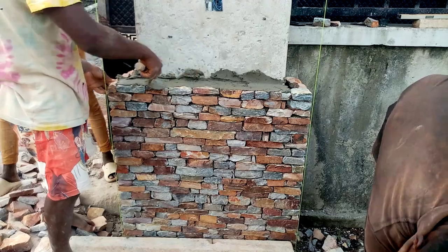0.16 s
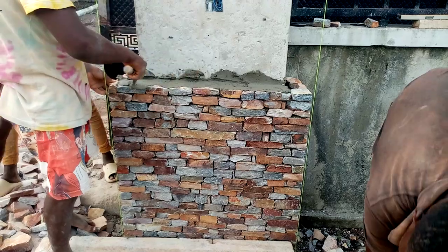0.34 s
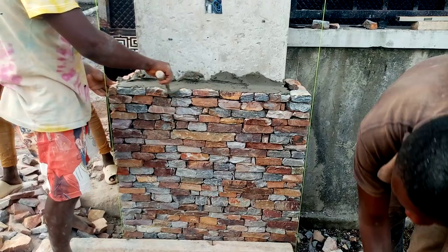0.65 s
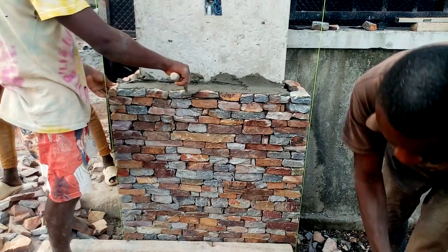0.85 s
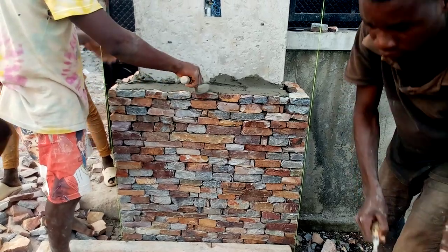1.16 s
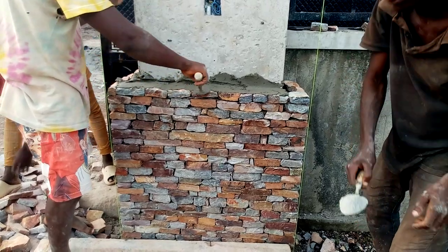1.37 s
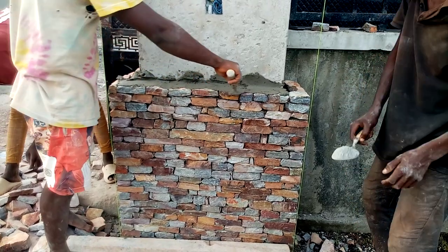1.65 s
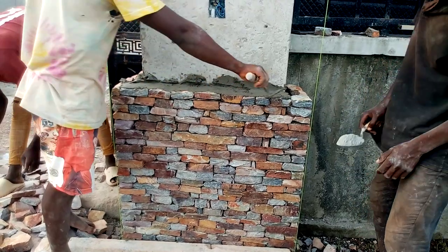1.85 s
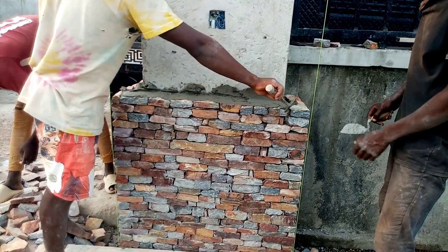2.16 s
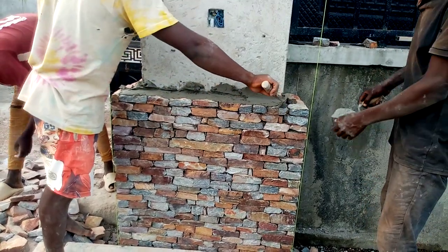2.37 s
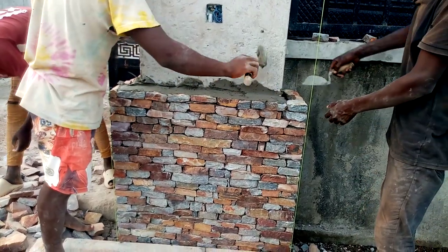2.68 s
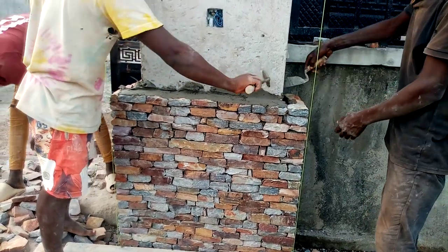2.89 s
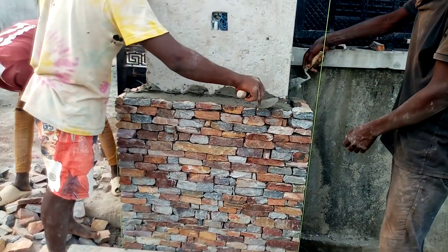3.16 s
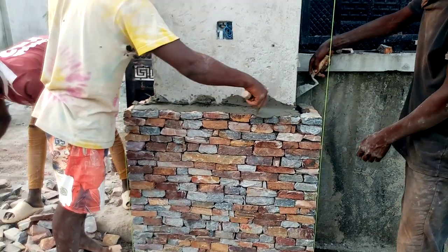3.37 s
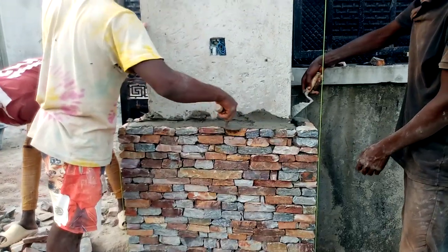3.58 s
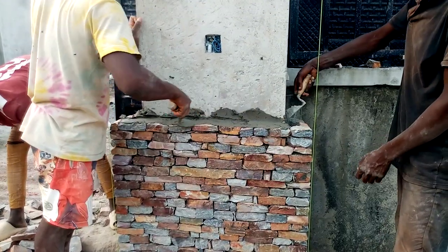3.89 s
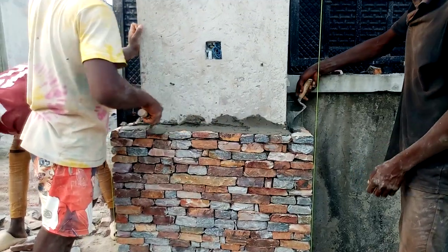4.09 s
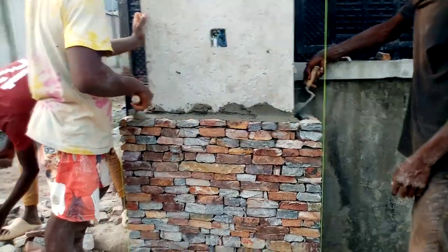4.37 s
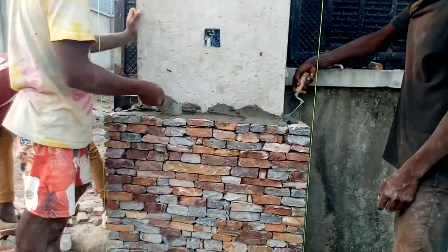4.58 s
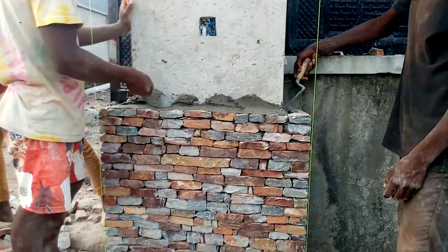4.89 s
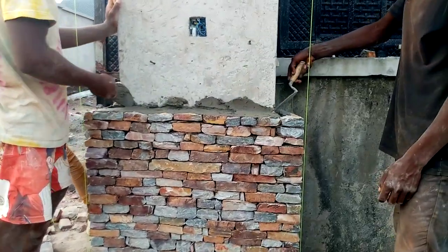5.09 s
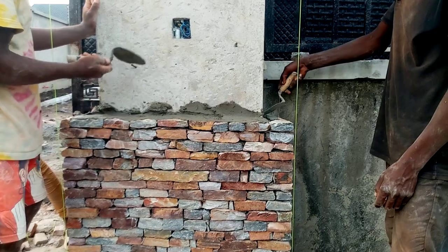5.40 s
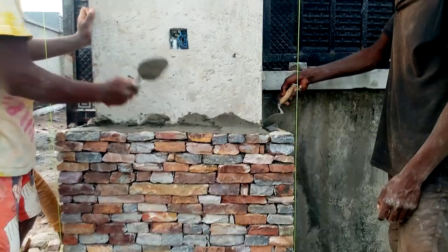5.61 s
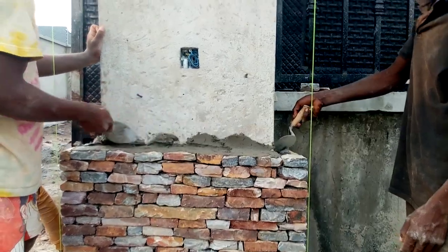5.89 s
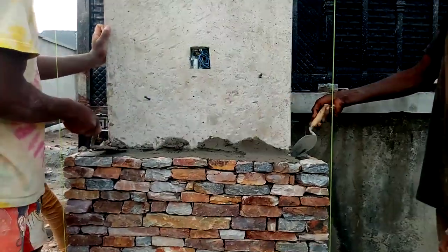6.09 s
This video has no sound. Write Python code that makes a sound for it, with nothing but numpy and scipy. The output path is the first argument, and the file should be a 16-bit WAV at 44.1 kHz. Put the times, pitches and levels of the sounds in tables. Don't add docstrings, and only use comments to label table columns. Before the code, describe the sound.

A steel trowel grates through gritty wet mortar and taps stone close by, with four hard hammer cracks echoing outdoors over hiss and motor drone.

```python
import sys
import numpy as np
from scipy import signal
from scipy.fft import rfft, irfft
from scipy.io import wavfile
from scipy.ndimage import uniform_filter1d

SR = 44100
rng = np.random.default_rng(int(sys.argv[2]) if len(sys.argv) > 2 else 0)


def dump_mix(stems):
    frames = np.atleast_2d(stems).T
    limited = np.clip(frames, -1, 1)
    pcm = np.round(limited * 32767).astype(np.int16)
    wavfile.write(sys.argv[1], SR, pcm)


def voltage_ratio(decibels):
    exponent = np.asarray(decibels, float) / 20
    return 10 ** exponent


N = 275625
TIME = np.arange(N) / SR


def colour(x, points):
    hz, db = np.transpose(points)
    size = 4096
    grid_hz = np.arange(size + 1) * SR / (2 * size)
    curve_db = np.interp(np.log(grid_hz + 1), np.log(hz), db)
    cepstrum = irfft(np.log(voltage_ratio(curve_db)))
    cepstrum[1:size] *= 2
    cepstrum[size + 1:] = 0
    impulse = irfft(np.exp(rfft(cepstrum)))[None, :size]
    return signal.oaconvolve(np.atleast_2d(x), impulse, axes=1)[:, :N]


def band(x, lo_hz, hi_hz):
    sos = signal.butter(2, [lo_hz, min(hi_hz, .45 * SR)], "bandpass", fs=SR, output="sos")
    return signal.sosfilt(sos, x) * np.sqrt(SR / 2 / (hi_hz - lo_hz))


def ring(x, hz, t60_s):
    r = np.exp(-np.log(1000) / (t60_s * SR))
    w = 2 * np.pi * hz / SR
    return signal.lfilter([0, r * np.sin(w)], [1, -2 * r * np.cos(w), r * r], x)


def pair(alike):
    first, other = rng.standard_normal((2, N))
    alike = np.clip(alike, 0, 1)
    return np.array([first, alike * first + np.sqrt(1 - alike ** 2) * other])


def ports(x, pan_db, lag_ms):
    late = np.interp(TIME - lag_ms / 1000, TIME, x[1], left=0)
    return np.array([x[0] * voltage_ratio(pan_db / 2), late * voltage_ratio(-pan_db / 2)])


def walk(rate_hz):
    k = int(SR / rate_hz)
    held = np.repeat(rng.standard_normal(N // k + 1), k)
    return uniform_filter1d(held, k)[:N] / np.sqrt(2 / 3)


def air():
    # frequency in Hz, level in dB per Hz.
    hiss_colour = [(170, -18), (371, -22), (700, -7.5), (1240, -4), (4500, -16), (9000, -22), (10000, -48),
                   (17600, -41)]
    # time in seconds, level in dB.
    breeze = [(.15, 2.5), (.9, 2), (1.24, -3.5), (1.6, 3.5), (2.6, -0.5), (2.83, -0.5), (3.5, 0.5),
              (4.4, 2), (4.63, -3), (4.76, 2.5), (4.93, -1), (5.08, 1), (5.2, 0.5), (5.33, 1.5), (5.5, -2),
              (5.66, 4), (5.83, -3.5), (6.0, 2)]
    # low edge in Hz, high edge in Hz, level in dB, dB per dB of breeze.
    layers = [(150, 930, 5, 1.54), (1114, 2080, 1.5, 2.5), (2280, 5260, -0.5, 4), (5160, 17000, 4.5, 2)]
    x = colour(pair(0.43), hiss_colour)
    x = x / x.std()
    breeze_db = np.interp(TIME, *np.transpose(breeze))
    out = 0
    for lo_hz, hi_hz, db, slope in layers:
        layer = band(x, lo_hz, hi_hz) * np.sqrt(2 * (hi_hz - lo_hz) / SR)
        out = out + layer * voltage_ratio(-53 + db + slope * breeze_db + 1.5 * walk(14))
    return ports(out, 3.4, 0.88)


def sand(gusty):
    grains = voltage_ratio(5.7 * np.minimum(rng.exponential(size=N), 4.0)) * (rng.random(N) < .06)
    gust_db = gusty * (7.7 * walk(150) + 2.3 * walk(30))
    push = (0.54 + uniform_filter1d(grains, size=24) * 3.3) * voltage_ratio(np.minimum(gust_db, 4))
    return push / np.sqrt(np.mean(push ** 2))


def grit():
    # time in seconds, level in dB.
    pressure = [(.15, -45.5), (.53, -42.5), (.78, -43.5), (.95, -55.5), (1.08, -52), (1.27, -99),
                (1.31, -44.5), (1.56, -49.5), (1.86, -48), (2.75, -49.5), (3.02, -52), (3.23, -42.5),
                (3.6, -47.5), (3.85, -40.5), (4.1, -44.5), (4.46, -55), (5.64, -51), (6.25, -48)]
    # low edge in Hz, high edge in Hz, level in dB at firm pressure, dB per dB of pressure.
    layers = [(1390, 5250, -36, 2.64), (4180, 9120, -38.5, 2.07), (320, 820, -43, 3),
              (9000, 9700, -43, 16.5), (14700, 15500, -41.5, 2)]
    firm_db, flicker_db = -40, 1.3
    press_db = np.interp(TIME, *np.transpose(pressure)) - firm_db
    x = pair(0.89) * sand(.22) * voltage_ratio(flicker_db * walk(30))
    out = 0
    for lo_hz, hi_hz, db, slope in layers:
        level_db = db + slope * press_db + flicker_db * walk(40) + 2.6 * walk(160)
        out = out + voltage_ratio(level_db) * band(x, lo_hz, hi_hz)
    return ports(out, 2.7, 1.205)


def rumble():
    # peak time in seconds, level in dB, build-up in seconds, fade in seconds.
    surges = [(.49, -50, 0.64, 1), (1.07, -43.5, 0.073, 0.075), (1.46, -46.5, 0.77, 0.26),
              (1.949, -42, 0.014, 0.078), (2.289, -43, 0.024, 0.037), (2.7, -43.5, 0.15, .2),
              (3.29, -40.5, 1, 0.18), (3.5, -36.5, 0.16, 0.38), (3.787, -30.5, 0.052, 0.018),
              (4.21, -37.5, 0.066, 0.18), (4.65, -48, 0.033, 0.044), (5.08, -43.5, 0.56, 0.18),
              (5.55, -47, 0.54, 0.11), (6.14, -49, 0.3, 0.2)]
    # frequency in Hz, level in dB per Hz.
    drone_colour = [(30, -59), (55, -4), (100, -6), (122, 1.5), (137, -1), (170, -8), (230, -20.5),
                    (450, -65)]
    idle_db, surge_db = -55.5, 13.5
    db = np.full(N, idle_db)
    for s, top_db, build_s, fade_s in surges:
        away = np.maximum((s - TIME) / build_s, (TIME - s) / fade_s)
        db = np.maximum(db, top_db - surge_db * away)
    x = colour(pair(0.68), drone_colour)
    return ports(x / x.std() * voltage_ratio(db - 0.5), 2.0, 0.68)


def knock(age, t60_ms, tail_db):
    fade_db = 60 * age / (max(t60_ms, 4) / 1000)
    decay = voltage_ratio(-6.5 - 3.6 * fade_db) + voltage_ratio(-fade_db) + voltage_ratio(tail_db - 0.083 * fade_db)
    return (1 - np.exp(-age / 0.00021)) * decay


def slide(age, length_ms, tail_db):
    over = np.maximum(age - length_ms / 1000, 0)
    return (1 - np.exp(-age / 0.00086)) * (np.exp(-over / 0.0042) + voltage_ratio(tail_db) * np.exp(-over / 0.012))


def cracks(events, shape, push, crest_db, tail_db, sizzle_db, body_hz, patchy_db=2.5):
    env = np.zeros((3, N + 8192))
    age = np.arange(8192) / SR
    for s, db, thud_db, edge_db, ms in events:
        at = int(s * SR)
        parts_db = np.array([[thud_db], [0], [edge_db]])
        env[:, at:at + 8192] += voltage_ratio(db + crest_db + parts_db) * shape(age, ms, tail_db)
    env[:, :N] *= voltage_ratio(patchy_db * np.array([walk(220) for _ in env]))
    impacts = np.clip(pair(0.45), -1.2, 1.2) * 1.236
    thud, body, edge = impacts * push * env[:, None, :N]
    out = band(thud, 504, 1940) + band(body, body_hz, 5400) + band(edge, 4435, 8470)
    out = out + voltage_ratio(sizzle_db) * band(edge + 0.39 * body, 9580, 11380)
    return out + voltage_ratio(sizzle_db + 9.5) * band(edge + 0.5 * body, 14200, 17900)


def contacts(table, thud_db, ms):
    return [(s, db, thud_db, edge_db, ms) for s, db, edge_db in table]


def trowel():
    # start in seconds, peak in dB, edge in dB.
    dry_taps = [(.5762, -17, 1), (.599, -20, 3.5), (.6545, -22, 0), (.6948, -15.5, -3), (.8194, -35, 12),
                (.9351, -18, 8), (1.0441, -18.5, 3), (1.4031, -16, 8), (1.6154, -15.5, -19),
                (1.722, -12.5, -0.5), (2.0335, -14.5, 3), (2.6349, -13.5, -5.5), (2.9257, -15.5, -3.5),
                (3.349, -20, 6.5), (3.3674, -17.5, 8.5), (3.493, -9.5, -5), (4.0427, -10.5, -2.5),
                (4.2083, -7, -9.5), (4.3246, -15, -4), (4.9841, -18, -2.5), (5.1248, -33, -7),
                (5.136, -29.5, -5), (5.2758, -11.5, 4), (5.5628, -9.5, 3.5), (5.637, -26.5, 1),
                (5.8558, -32, -9), (5.8605, -9, -4.5), (5.8744, -18, -10), (5.891, -38, -28),
                (6.0858, -23.5, 0), (6.1739, -12.5, 5.5)]
    pats = [(.172, -34.5, 11), (.194, -30, 7), (0.43, -20, -7), (.6722, -21, 10), (0.57, -25.5, 7),
            (1.6725, -16, 9), (2.0694, -17.5, 1), (2.3, -26, -3.5), (1.778, -30, 6.5), (2.155, -41.5, 9),
            (2.18, -36, 0), (1.016, -31, 0), (.634, -41, -12), (2.601, -40, 10), (2.788, -29.5, 3),
            (2.845, -37, -9), (6, -26.5, -16), (2.4, -29.5, -15), (3.635, -26, 8.5), (3.8, -27, 13),
            (3.933, -24, 10), (5.094, -27, -3), (3.5, -31, -11), (3.2089, -14, 9.5), (3.392, -21.5, 9.5),
            (5.9287, -27.5, -14), (6.0735, -21, 4)]
    dry_slips = [(.4367, -14.5, -21), (.4514, -18.5, -3), (.8764, -25, 10), (1.291, -19, 1.5),
                 (1.305, -28.5, 7), (1.3623, -18, 0.5), (1.3809, -18, -10.5), (1.453, -10, -1.5),
                 (1.4854, -27, -17), (1.4918, -16.5, 6.5), (1.5604, -21.5, -9), (2.4458, -20.5, -13),
                 (2.745, -25.5, -7), (3.2715, -27, 5), (3.2889, -23.5, 4), (3.3044, -23.5, 9),
                 (3.421, -13.5, 0), (3.7085, -15, 3), (3.724, -14, -2), (3.7569, -12, -5), (4.1041, -21, 2),
                 (4.1344, -26, -8), (6.1409, -24, -15), (6.1594, -15.5, -5)]
    smears = [(.2478, -37, -7), (.4254, -23.5, 11), (.893, -24.5, 10), (.9004, -25, 6),
              (.9114, -26.5, 13.5), (.918, -19, -11), (1.4154, -16, 1.5), (1.429, -22, -22),
              (2.2024, -33, 4), (2.2358, -34, 0), (2.8804, -27.5, -24.5), (3.02, -26.5, 5),
              (3.238, -12, 3.5), (4.1579, -25, 8), (4.1697, -18, -4), (4.1967, -27, -25.5),
              (4.2214, -18, -10), (4.3819, -45, -14.5), (4.3994, -43, -21), (5.7588, -37, -13)]
    shoves = [(.3244, -28, -6), (.4758, -26, -0.5), (.4994, -24, -5), (.605, -25, -6), (.74, -20.5, -2),
              (.852, -20, -1), (.868, -23.5, -3), (.885, -30, 1), (.902, -38, -4), (1.339, -28.5, -15),
              (1.8568, -25, -7), (2.985, -34, 3.5), (3.627, -18.5, -1.5), (3.6744, -20, 3.5),
              (3.9774, -19.5, 0.5), (3.9937, -19, -9), (4.114, -22.5, 2), (4.4887, -42, -5),
              (4.6808, -30.5, -6), (4.8285, -25.5, -3), (5.03, -24, -4), (5.0594, -31, 1), (5.089, -37, -7),
              (5.9464, -30, -12), (5.9763, -24.5, -17), (5.9994, -41, -10)]
    # frequency in Hz, level in dB, t60 in seconds.
    tap_ring = [(1606, -36.5, 0.03), (2420, -26, 0.0079), (2868, -23, 0.0074), (3665, -22, 0.012),
                (4265, -18, 0.0055), (4894, -24.5, 0.011), (5645, -19.5, 0.0033), (6600, -14, 0.0018)]
    tap_t60_ms, slip_ms, shove_ms = 30.7, 5.8, 16.8
    taps = contacts(dry_taps, -44, tap_t60_ms) + contacts(pats, -7, tap_t60_ms)
    slips = contacts(dry_slips, -13, slip_ms) + contacts(smears, -5.5, slip_ms)
    slips = slips + contacts(shoves, -26, shove_ms)
    taps = cracks(taps, knock, 0.64, crest_db=-11.5, tail_db=-25.5, sizzle_db=-0.5, body_hz=1226)
    taps = taps + sum(voltage_ratio(db) * ring(taps, hz, t60_s) for hz, db, t60_s in tap_ring)
    slips = cracks(slips, slide, sand(0.059), crest_db=-14.5, tail_db=-16.5, sizzle_db=-8, body_hz=1200)
    return ports(taps + slips, 5.15, 1.371)


def feet():
    # middle in seconds, length in seconds, level in dB, frequency in Hz.
    shuffles = [(0.334, .12, -48.5, 288), (0.697, 0.083, -54, 237), (0.95, 0.035, -52.5, 238),
                (1.07, 0.034, -55, 390), (2.076, 0.075, -53.5, 300), (2.395, 0.057, -51, 730),
                (3.94, 0.13, -53.5, 255), (4.47, 0.15, -54.5, 1310), (4.53, 0.043, -57, 230),
                (5.16, 0.043, -50, 600), (4.55, 0.038, -56, 7200), (5.413, .03, -61.5, 7260),
                (6.175, 0.01, -38.5, 5090)]
    out = 0
    x = pair(0.74) * voltage_ratio(2.9 * walk(60))
    for s, length_s, db, hz in shuffles:
        swell = np.exp(-((TIME - s) / length_s) ** 2)
        out = out + voltage_ratio(db) * swell * band(x, hz * 0.836, hz * 1.18)
    return ports(out, 2.5, 1.11)


def hollows():
    # start in seconds, peak in dB, frequency in Hz, t60 in seconds.
    booms = [(0.491, -40.5, 96.7, 0.1), (0.611, -43, 110, 0.12), (.9, -48, 160, 0.094),
             (1.051, -42.5, 126.3, 0.18), (1.288, -52, 123, .25), (1.399, -42, 114.2, 0.56),
             (1.941, -40, 129.7, 0.12), (2.285, -57, 107.4, 0.091), (2.399, -46.5, 108, 0.12),
             (2.659, -44, 112, 0.14), (2.84, -44, 138, 0.2), (3.044, -26, 99.7, 0.047),
             (3.094, -38, 127, 0.12), (3.293, -38.5, 113, 0.12), (3.47, -35.5, 112.6, 0.2),
             (3.549, -38.5, 106.7, 0.24), (3.774, -31, 94.6, 0.07), (4.64, -39, 129, 0.11),
             (5.041, -45, 121, 0.51), (5.53, -40.5, 137, 0.1), (6.122, -40, 75, 0.12)]
    # start in seconds, peak in dB, frequency in Hz.
    clunks = [(0.658, -34.5, 880), (0.879, -34, 850), (1.557, -37, 900), (1.616, -40, 920),
              (1.683, -36, 840), (1.721, -38, 930), (2.073, -31.5, 870), (2.338, -34, 870),
              (2.378, -36, 907), (2.87, -35.5, 986), (3.553, -49, 850), (4.381, -35, 930),
              (4.401, -34.5, 722), (4.491, -40.5, 690), (4.578, -46, 850), (4.679, -40.5, 944),
              (4.848, -35, 1030), (5.134, -30.5, 1037), (5.642, -45, 860), (6.074, -33, 834)]
    ground, bed = np.zeros((2, N + 16384))
    age = TIME[:16384]
    rise = 1 - np.exp(-age / 0.0051)
    for s, db, hz, t60_s in booms:
        fade = voltage_ratio(db + 9.0 - 60 * age / t60_s)
        ground[int(s * SR):][:16384] += fade * rise * np.sin(2 * np.pi * hz * age)
    for s, db, hz in clunks:
        fade = voltage_ratio(db - 1.0 - 60 * age / 0.056)
        bed[int(s * SR):][:16384] += fade * np.sin(2 * np.pi * hz * age)
    out = ground[:N] + bed[:N] * voltage_ratio(2 * walk(330))
    return ports(np.array([out, out]), 5.2, 1.08)


def bird():
    # start in seconds, level in dB.
    chips = [(1.025, -50), (1.055, -60), (1.103, -42.5), (1.136, -44), (4.52, -51), (4.572, -51),
             (4.598, -46), (4.653, -43), (4.685, -45), (5.673, -45), (5.727, -49.5), (5.762, -49)]
    # start in seconds, level in dB, first frequency in Hz.
    tweets = [(1.075, -52, 8400), (1.115, -54, 8900), (1.155, -45, 9000), (1.198, -47, 9050),
              (1.24, -48, 9050), (1.27, -33, 7780), (4.524, -43, 7500), (4.552, -52, 8650),
              (4.595, -53, 8900), (4.635, -47, 9050), (4.678, -41, 8900), (4.72, -45, 9000),
              (5.33, -52, 8950), (5.375, -54, 9000), (5.39, -43, 7500), (5.42, -52, 8900)]
    chip_hz, chip_s, chip_fall = 5800, .019, .06
    out = np.zeros(N)
    age = TIME[:1024] / chip_s
    shape = np.interp(age, [0, .2, .5, 1], [0, 0.69, 0.74, 0.23])
    for s, db, hz in [(s, db, chip_hz) for s, db in chips] + tweets:
        glide_hz = hz * (1 - chip_fall * np.minimum(age, 1) ** 3)
        out[int(s * SR):][:1024] += voltage_ratio(db) * shape * np.sin(2 * np.pi * np.cumsum(glide_hz) / SR)
    out = out * voltage_ratio(2.7 * walk(330))
    out = out + 0.16 * np.roll(out, 600) + 0.11 * np.roll(out, 1100)
    return ports(np.array([out, out]), 1.6, 0.591)


def goat():
    # start in seconds, end in seconds, first frequency in Hz, last frequency in Hz, level in dB.
    bleats = [(1.336, 1.47, 877, 900, -60), (1.712, 1.82, 761, 802, -54.5), (1.75, 1.895, 535, 517, -57.5),
              (1.967, 2.136, 960, 895, -55), (4.326, 4.76, 957, 954, -60.5),
              (4.627, 4.796, 610, 610, -65.5), (4.77, 4.84, 930, 945, -66), (4.887, 4.97, 1077, 1066, -60),
              (5.282, 5.389, 985, 990, -56.5), (5.597, 5.799, 878, 902, -57), (5.618, 5.706, 559, 588, -63),
              (5.636, 5.713, 1070, 1036, -55)]
    out, quaver, tremble = np.zeros(N), walk(30), walk(80)
    for t0, t1, first_hz, last_hz, db in bleats:
        on = slice(int(t0 * SR), int(t1 * SR))
        t = TIME[on]
        hz = np.interp(t, [t0, t1], [first_hz, last_hz]) * (1 + 0.012 * quaver[on])
        phase = 2 * np.pi * np.cumsum(hz) / SR
        swell = np.clip(np.minimum(t - t0, t1 - t) / 0.027, 0, 1)
        voice = np.sin(phase) + voltage_ratio(-14) * np.sin(2 * phase)
        out[on] += swell * voltage_ratio(db + 2.0 + 4.2 * tremble[on]) * voice
    return ports(np.array([out, out]), 9.3, 1.75)


def hammer():
    # start in seconds, peak in dB, thud in dB, edge in dB.
    blows = [
        (1.5015, -9.5, -17.5, -9),
        (2.2834, -7, -16.5, -3),
        (3.042, -6.5, -14, -3),
        (3.7771, -6, -17.5, -4.5),
    ]
    # frequency in Hz, level in dB, t60 in seconds.
    head_modes = [(2630, -50, 0.073), (5780, -43, 0.017), (6640, -30, 0.0059), (7510, -36.5, 0.052),
                  (10520, -33.5, 0.064), (12000, -43, 0.071)]
    head_db = [-7.5, -1.5, -0.5, -4.5]
    blow = cracks([(*row, 29.1) for row in blows], knock, 0.93, crest_db=3.0, tail_db=-27.5,
                  sizzle_db=-15.5, body_hz=1666, patchy_db=0.95)
    blow = blow + sum(voltage_ratio(db + 6.7 * walk(250)) * ring(blow, hz, t60_s) for hz, db, t60_s in head_modes)
    blow = blow + voltage_ratio(-23) * band(np.abs(blow), 152, 1100)
    age = np.arange(30000) / SR
    yard = voltage_ratio(-43.5 - 60 * age / 0.51) * np.minimum(age / 0.096, 1)
    slap_s = .051
    wall = (age > slap_s) * voltage_ratio(-49 - 60 * np.abs(age - slap_s) / 0.31)
    echo = signal.oaconvolve(blow, pair(0.063)[:, :len(age)] * (yard + wall), axes=1)[:, :N]
    free = blow * voltage_ratio(np.interp(TIME, np.transpose(blows)[0], head_db))
    hiss_tail = pair(0.71)[:, :len(age)] * voltage_ratio(-29.0 - 60 * age / 0.43)
    hiss = signal.oaconvolve(free, hiss_tail, axes=1)[:, :N]
    echo = echo + voltage_ratio(-22.5) * band(band(hiss, 10300, 11600), 10200, 11800)
    return ports(blow, 1.0, 1.419) + ports(echo, 0.83, 0.9)


def plops():
    # start in seconds, peak in dB, hollow frequency in Hz.
    lumps = [(2.79, -38, 402), (2.844, -49, 285), (2.867, -29.5, 237), (2.881, -32.5, 238),
             (2.974, -30, 620), (3.098, -27, 550), (3.55, -40, 220), (4.206, -24.5, 297), (4.247, -23, 368),
             (4.282, -24, 505), (4.296, -30, 350)]
    out = np.zeros(N)
    age = TIME[:2048]
    slap = voltage_ratio(-9.5) * band(rng.standard_normal(N), 370, 1630)
    sag_per_s = 46
    sunk = (1 - np.exp(-age * sag_per_s)) / sag_per_s
    for s, db, hz in lumps:
        at = int(s * SR)
        shape = (1 - np.exp(-age / 0.00074)) * np.exp(-age * hz * 0.97)
        out[at:at + 2048] += voltage_ratio(db + 7.5) * (np.sin(2 * np.pi * hz * sunk) + slap[at:at + 2048]) * shape
    return ports(np.array([out, out]), 8.0, 1.39)


def blade():
    # start in seconds, length in seconds, level in dB, grip from 0 (flat) to 1 (tip).
    drags = [
        (4.666, 0.061, -52.5, .01),
        (4.825, 0.031, -44.5, 0.028),
        (5.029, 0.016, -37.5, 0.02),
        (5.063, .06, -42.5, 0.048),
        (5.944, 0.086, -41, 0.87),
    ]
    # frequency in Hz, width in Hz, dB held flat, dB held on the tip.
    modes = [(453, 29, -18.5, 3.5), (904, 14, -20.5, -12), (1380, 22, -20.5, 8), (1720, 42, -0.5, -16.5),
             (1850, 37, -2.5, 5), (2830, 18.5, 3.5, 4), (3300, 28, -6.5, -15.5), (3920, 29, -10, -7),
             (4890, 37, -18, -1.5), (5090, 30, -7.5, -5), (5540, 79, -27, -18), (6480, 120, -11, -5),
             (6840, 60, -21, -7), (3580, 80, -21, -20)]
    top_modes = [(6000, 30, -28, -20), (7930, 120, -7, -20), (8330, 45, -10, -23), (8930, 35, -13, -24),
                 (10000, 40, -3, -20), (10500, 35, -14, -28)]
    on = slice(int(drags[0][0] * SR), N)
    t = TIME[on]
    drag, grip = np.zeros(len(t)), np.zeros(len(t))
    out = np.zeros((2, N))
    for s, length_s, db, tip in drags:
        age = t - s
        fade_db = 47 * age + 650 * np.maximum(age - length_s, 0)
        drag = drag + np.clip(age / .003, 0, 1) * voltage_ratio(db - np.maximum(fade_db, 0))
        grip[age > 0] = tip
    chatter = (pair(0.85) * voltage_ratio(2.23 * walk(64)))[:, on] * drag
    bent = np.cumsum(1 + 0.0028 * walk(25)[on]) / SR
    lock_db = -30.5
    for hz, width_hz, flat_db, tip_db in modes + top_modes:
        grip_db = flat_db + grip * (tip_db - flat_db)
        locked = drag * voltage_ratio(grip_db + lock_db + 2.5 * walk(66)[on]) * np.sin(2 * np.pi * hz * bent)
        out[:, on] += locked * np.sqrt(SR / 2 / width_hz)
        rung = ring(chatter * voltage_ratio(grip_db) + 1e-18, hz, 1.12 / width_hz)
        out[:, on] += np.sqrt(4 * np.pi * width_hz / SR) * rung
    return ports(out, 4.7, 1.339)


def scene():
    near = trowel() + plops() + hollows() + hammer() + grit() + blade()
    return near + rumble() + goat() + bird() + air() + feet()


def thin(x):
    hz, _, z = signal.stft(x, SR, nperseg=2048, noverlap=1536)
    power = uniform_filter1d((np.abs(z) ** 2).sum(axis=0), size=5, axis=0)
    loud = power[(hz > 4000) & (hz < 8000)].mean(axis=0)
    mask_db, mask_from_hz = -26.5, 9300
    keep = (power > loud * voltage_ratio(2 * mask_db)) | (hz < mask_from_hz)[:, None]
    return signal.istft(z * keep, SR, nperseg=2048, noverlap=1536)[1][:, :N]


def low_pass(x):
    return signal.sosfilt(signal.butter(12, 15900, fs=SR, output="sos"), x)


def record(dry):
    # frequency in Hz, level in dB.
    far_port = [(300, -5.5), (1200, -4), (3000, -5.5), (7000, 3)]
    # frequency in Hz, level in dB.
    port_curve = [(200, 0.5), (5000, 6.5), (6700, 10), (7600, -1), (8300, -11.5), (9500, -13.5),
                  (15400, -22.5), (15900, -48)]
    x = np.array([dry[0], colour(dry[1], far_port)[0]])
    x = colour(x, port_curve) * np.clip((TIME - .149) / 0.049, 0, 1)
    x = signal.sosfilt(signal.butter(2, 40, "highpass", fs=SR, output="sos"), x)
    return low_pass(np.clip(thin(x), -1, 1))


dry = scene()
out = record(dry)
dump_mix(out)
```